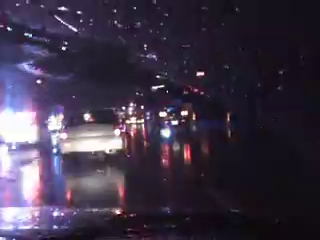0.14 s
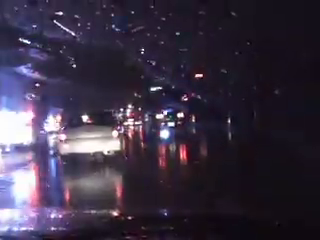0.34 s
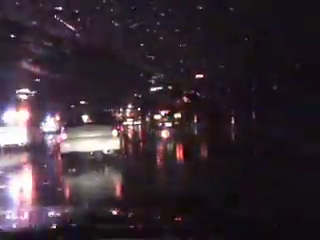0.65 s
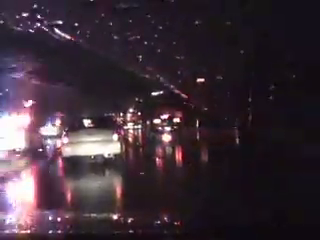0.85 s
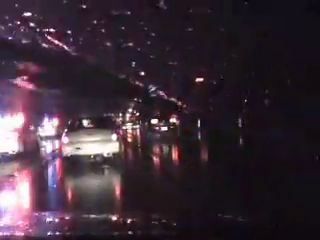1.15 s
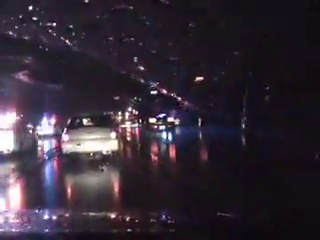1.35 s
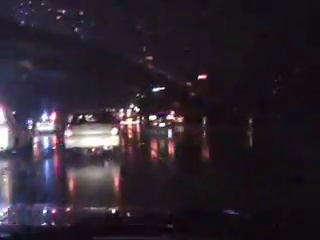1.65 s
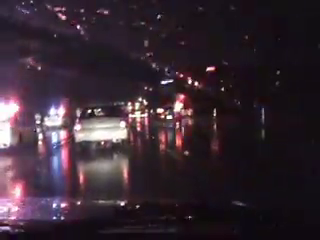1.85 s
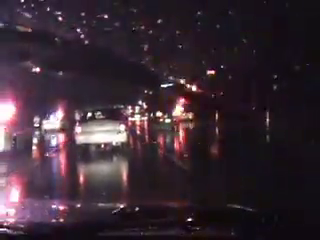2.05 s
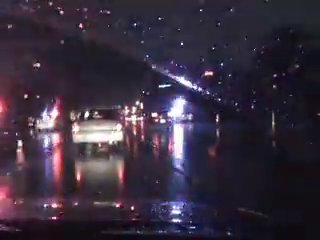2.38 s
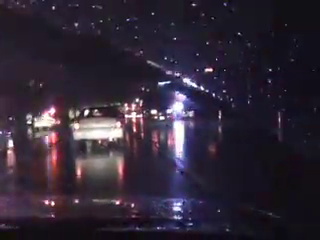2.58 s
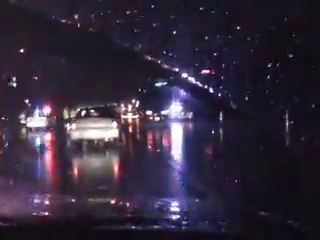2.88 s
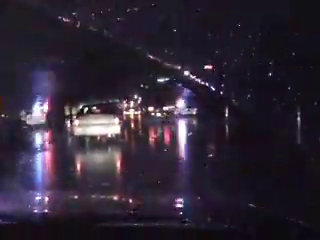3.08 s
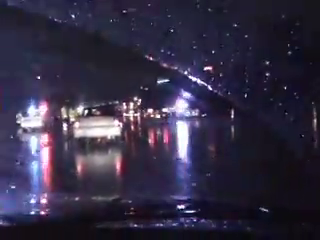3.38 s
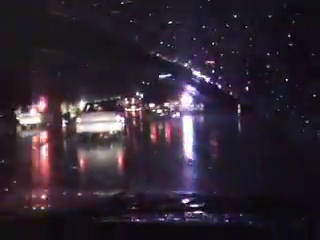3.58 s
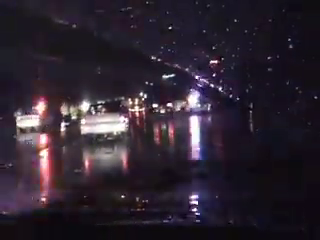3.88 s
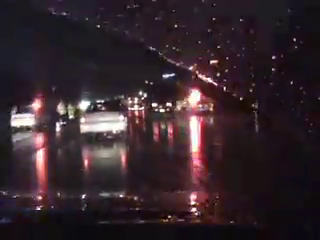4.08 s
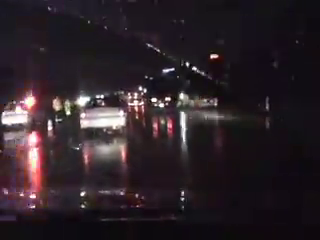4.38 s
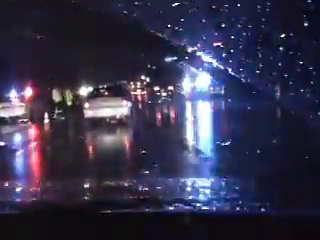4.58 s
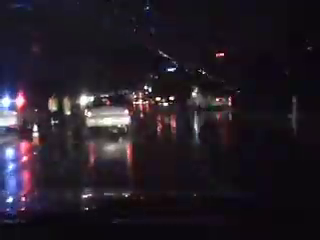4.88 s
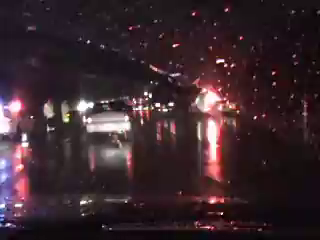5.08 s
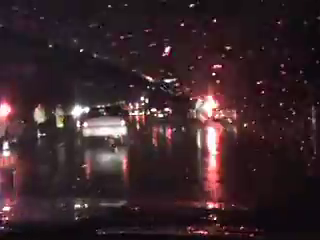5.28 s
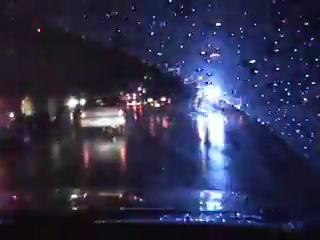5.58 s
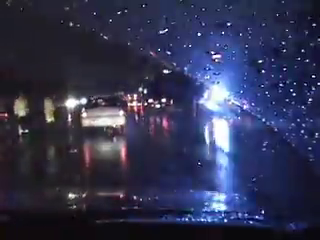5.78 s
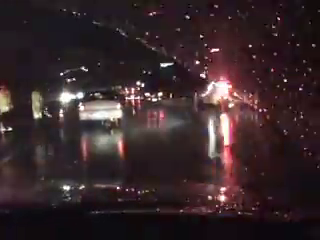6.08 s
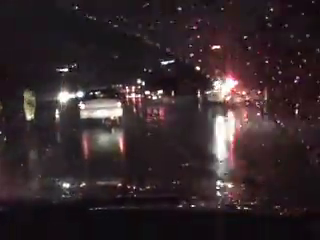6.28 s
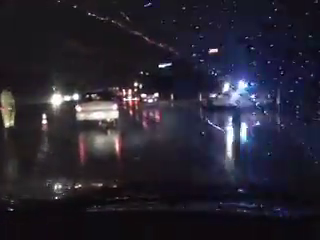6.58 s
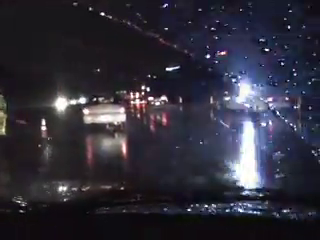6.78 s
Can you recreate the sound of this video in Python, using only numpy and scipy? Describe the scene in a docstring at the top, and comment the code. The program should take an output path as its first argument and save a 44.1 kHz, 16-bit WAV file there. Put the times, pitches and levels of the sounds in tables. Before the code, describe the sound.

Rain ticks and smacks on glass over soft tyre rumble, with juddering wiper thuds and paired rubbery flips, the drops growing denser near the end.

```python
"""Rain on a slowly rolling car, heard inside: noise-burst drops over a wash of fine spray, louder at the end.
Fat drops smack the windshield; a few heavy drops knock a panel with a hollow tock; dull pushes come from the
roof. Every 1.6 s the wipers make a judder and thud, then about 0.55 s later two rubbery flips. Filtered noise
makes the tyre and road rumble; two sines make a drivetrain hum; damped sines make bumps."""
import sys
import numpy as np
from scipy import signal
from scipy.fft import rfft, irfft, next_fast_len
from scipy.io import wavfile
from scipy.ndimage import map_coordinates

SR = 44100
rng = np.random.default_rng(int(sys.argv[2]) if len(sys.argv) > 2 else 0)


def waveform_to_disk(signal):
    """Save audio, clipped to [-1, 1], as 16-bit WAV at the path in sys.argv[1]."""
    frames = np.transpose(np.atleast_2d(signal))
    scaled = np.clip(frames, -1, 1) * 32767
    samples = np.round(scaled).astype(np.int16)
    wavfile.write(sys.argv[1], SR, samples)


N = 306230

# Steady rain: (time [s], level [dB])
RAIN_LEVEL = [(0, -39.5), (3.9, -39), (5.6, -37), (6.94, -32.5)]
# Flurries and lulls: (middle [s], length [s], change [dB])
RAIN_FLURRIES = [(0.552, 0.12, 1.5), (0.983, 0.11, 3.5), (1.2, 0.16, -2), (1.408, 0.13, 3),
                 (1.847, 0.12, 1.5), (2.954, 0.12, 1.5), (3.31, 0.87, 2), (3.763, 0.19, -2.5),
                 (4.217, 0.19, 3.5), (4.495, 0.24, 4), (4.748, 0.22, 1), (4.947, 0.12, -3.5),
                 (5.235, 0.37, 1), (5.55, 0.11, -3), (6.045, 0.081, 6.5), (6.22, 0.19, 2.5),
                 (6.61, 0.38, 1), (6.925, 0.074, 0.5)]
FLURRY_EDGE = 8.7  # exponent; higher is more abrupt
# Drop spectrum on glass: (frequency [Hz], relative level [dB])
PATTER_SPECTRUM = [(200, -19.5), (600, -11.5), (1200, -0.5), (1600, -2.5), (2100, -5), (2600, 2),
                   (3400, 1.5), (4200, -2.5), (5000, -6.5), (6500, -10.5), (7600, -12.5), (9500, -19),
                   (10500, -24), (11500, -55)]
# Fat windshield drops: (time [s], relative peak [dB], relative left minus right [dB], extra treble [dB])
BIG_DROPS = [(0.345, -26, 3, 7), (0.4626, -20, 2, -2), (0.8009, -18, 2, -4), (0.9851, -22, 2, -2),
             (1.0118, -18, 0, 1), (1.211, -19, 5, -1), (1.3627, -28, 8, -4), (1.378, -13, 4, 2),
             (1.4116, -17, 2, -7), (1.4827, -13, 9, 2), (2.6418, -18, 3, -11), (3.2042, -17.5, 9, 4),
             (3.3209, -15.5, 4, 3), (4.045, -23, 3, -2), (4.203, -22, 9, 8), (4.234, -19, 3, 9),
             (4.2608, -26, 2, 8), (4.282, -20, 2, 2), (4.3562, -16.5, 10, -12), (4.3877, -12.5, 8, 2),
             (4.4183, -26, 7, 1), (4.4503, -21, 5, 2), (4.496, -17, 8, 3), (4.5048, -22, 1, 9),
             (4.5117, -14, 12, 0), (4.5655, -24, 4, 3), (4.6523, -17.5, 9, 3), (4.709, -20, 4, -5),
             (4.7402, -9, 1, 3.5), (4.7546, -18.5, 8, 3), (4.825, -15, 3, 0), (4.879, -17, 7, 1),
             (5.052, -20, 7, 0), (5.1237, -17, 8, -2), (5.1632, -17, 6, -16), (5.1826, -20, 6, 8),
             (5.233, -15, 2, 4), (5.2503, -20.5, -2, 4), (5.3282, -17, 7, 3), (5.4285, -20, 2, -6),
             (5.4517, -23, 6, 0), (5.6389, -15.5, 5, -6), (5.6576, -19, 5, 2), (5.8056, -20, 7, 6),
             (5.9226, -17, 3, -3), (5.9529, -12.5, 10, -3), (5.9957, -13, 7, -4), (6.0195, -17, 5, 0),
             (6.028, -14, 2, 5), (6.0459, -14.5, 9, 0), (6.0637, -17, 8, 0), (6.0786, -21, 3, 3),
             (6.1674, -18, 7, 1), (6.1813, -12, 12, 5), (6.1897, -17, 4, 1), (6.2236, -24, -2, 11),
             (6.2802, -11, 8, 1), (6.2825, -19, 1, -10), (6.2873, -14.5, 4, -5), (6.3688, -15, -3, 0),
             (6.4165, -16.5, 2, 8), (6.4787, -17, 2, 9), (6.5386, -27, 3, 3), (6.5522, -17, -1, 5),
             (6.6052, -16, 7, -1), (6.6194, -20, 4, 3), (6.6331, -11, 5, 1), (6.694, -22, 5, -5),
             (6.713, -12.5, 4, 6), (6.7495, -13.5, 5, -5), (6.7768, -19, 7, 3), (6.887, -17, 8, 7),
             (6.903, -21, 6, -3), (6.9127, -14, 5, -3), (6.92, -20, 5, -6)]
# Heavy drops knocking the bonnet or roof panel: (time [s], level [dB], pitch [Hz])
PANEL_KNOCKS = [(1.3783, -22, 1250), (1.3948, -12, 1220), (4.7411, -10, 1150), (6.368, -17, 1200)]

# Wiper turns at the foot of the glass: (time [s], rub [dB], thud [dB], shudder [dB])
WIPER_TURNS = [(0.103, -17.5, -16, -24), (1.711, -18, -11.5, -32), (3.317, -18, -7.5, -27),
               (4.927, -20, -10, -27.5), (6.533, -17, -20, -26)]
# Arm shudder spectrum: (frequency [Hz], relative level [dB])
SHUDDER_SPECTRUM = [(60, -27), (130, -1), (300, -1.5), (600, -2.5), (850, -17), (2000, -47), (5000, -100)]
# Blade flips at the far end: (time [s], level [dB], starting pitch [Hz], hold before release [s])
BLADE_FLIPS = [(0.654, -16, 537, 0.015), (0.699, -19.5, 518, .023), (2.265, -17.5, 542, 0.015),
               (2.306, -18.5, 520, .023), (3.873, -16, 520, 0.013), (3.918, -15, 521, .017),
               (5.478, -17.5, 538, 0.012), (5.523, -14.5, 513, .015)]
# Rubber on wet glass: (frequency [Hz], relative level [dB])
SCUFF_SPECTRUM = [(150, -30), (350, 3.5), (600, 1.5), (800, -8), (1300, -12), (2500, -45), (5000, -100)]
LIP_ROUGHNESS = 0.38  # uneven grip, 0-1
LIP_EASE_DB_PER_S, LIP_RISE_S = 105, 0.0009

# Drivetrain pulls up, shifts, pulls again: (time [s], hum pitch [Hz])
HUM_PITCH = [(0, 110), (1.1, 119.6), (2.0, 163.5), (2.8, 194.5), (3.2, 202.9), (3.65, 211.9), (4.15, 173.3),
             (4.8, 183), (5.5, 180.8), (6.0, 191.7), (6.94, 205.6)]
# Cabin resonances met by the hum: (frequency [Hz], relative level [dB])
CABIN_BOOM = [(110, -37), (143, -33.5), (166, -35.5), (182, -36), (193, -28.5), (208, -36), (240, -67),
              (325, -40), (355, -35), (385, -46.5), (411, -36), (425, -46)]
# Road bumps: (time [s], level [dB], pitch [Hz])
ROAD_BUMPS = [(0.191, -17, 117), (0.344, -16, 91), (1.193, -11.5, 151), (1.244, -11, 118),
              (2.508, -10.5, 99), (4.412, -14, 158), (4.755, -10.5, 68.5), (5.885, -13, 107)]

# Road rumble spectrum: (frequency [Hz], relative level [dB])
RUMBLE_SPECTRUM = [(12, -29), (25, -9), (33, -13), (42, -3.5), (52, -5), (64, 2.5), (76, 0.5), (90, -2),
                   (115, -2), (150, -4), (190, -13), (260, -14), (340, -38), (570, -120)]
CRUISE_HZ, RUMBLE_AT_CRUISE_DB, RUMBLE_DB_PER_DOUBLING = 187, -23, 5
# Cabin drone spectrum: (frequency [Hz], relative level [dB])
DRONE_SPECTRUM = [(120, -7.5), (200, -4.5), (270, -2), (350, 0), (450, -2), (600, -8), (740, -8),
                  (830, -14), (1050, -10.5), (1400, -16), (2200, -19), (5000, -55.5)]
# Drone swell as the car gathers way: (time [s], level [dB])
DRONE_SWELL = [(0, -28), (1.8, -28), (3.6, -26), (4.7, -26.5), (5.9, -25.5), (6.94, -24.5)]
# Tyre-driven resonances: (centre [Hz], half-width at half amplitude [Hz], level [dB])
TYRE_RESONANCES = [(123.6, 5.4, -32.5), (413.3, 10.5, -41), (513, 28, -43.5), (740, 30, -43),
                   (916, 18.6, -40), (969, 33, -39)]

# Stereo likeness of the noise: (frequency [Hz], left-right correlation [-1 to 1])
STEREO_LIKENESS = [(30, .85), (60, .9), (150, .945), (490, .89), (1380, .79), (3900, .58), (11200, .73)]
# Stereo lean of the whole cabin: (frequency [Hz], left minus right [dB])
STEREO_LEAN = [(30, -3), (60, -1), (110, 0.5), (190, 1.7), (340, 1), (610, 2.5), (1090, 4), (1960, 3.5),
               (3500, 3.5), (6250, 2), (11200, 0.5)]
TOP_HZ = 11600


def amp(db):
    """Decibels to gain."""
    return 10 ** (np.asarray(db) / 20)


def unit(x):
    """Scale to rms 1."""
    return x / np.sqrt(np.mean(x ** 2) + 1e-20)


def along(points, hz):
    """Interpolate (frequency [Hz], value) points on a log axis."""
    f, v = np.transpose(points)
    return np.interp(np.log(hz + 1), np.log(f + 1), v)


def curves(rows):
    """One value per sample for each column after the time."""
    s, *cols = np.transpose(rows)
    return [np.interp(np.arange(N) / SR, s, c) for c in cols]


def wobble(knots_per_s):
    """Smooth random curve through normally distributed knots."""
    knots = rng.standard_normal(int(N * knots_per_s / SR) + 4)
    return map_coordinates(knots, [np.arange(N) * knots_per_s / SR])


def filtered(x, response):
    """Multiply the spectrum of x by a function of frequency."""
    m = next_fast_len(N + SR // 2)
    return irfft(rfft(x, m) * response(np.fft.rfftfreq(m, 1 / SR)), m)[..., :N]


def causal(points, size=2048):
    """Sharp-fronted (minimum-phase) impulse response with a given spectrum."""
    cepstrum = irfft(np.log(amp(along(points, np.fft.rfftfreq(size, 1 / SR)))))
    cepstrum[1:size // 2] *= 2
    cepstrum[size // 2 + 1:] = 0
    return irfft(np.exp(rfft(cepstrum)))


def rush(gain):
    """Stereo noise of rms 1 with a given spectrum and the tabled left-right correlation."""
    def mid_side_gain(hz):
        # cos(2 * angle) is the correlation
        angle = np.arccos(np.clip(along(STEREO_LIKENESS, hz), -1, 1)) / 2
        return gain(hz) * np.array([np.cos(angle), np.sin(angle)])

    mid, side = filtered(rng.standard_normal((2, N)), mid_side_gain)
    return unit(np.array([mid + side, mid - side]))


def burst(points, t):
    """Short noise of rms 1 with a given spectrum."""
    spectrum = rfft(rng.standard_normal(len(t))) * amp(along(points, np.fft.rfftfreq(len(t), 1 / SR)))
    return unit(irfft(spectrum, len(t)))


def sine(hz, t):
    """Steady tone at zero phase when t is 0."""
    return np.sin(2 * np.pi * hz * t)


def swell(t, peak_s):
    """Soft rise to 1 at peak_s, then an exponential fall."""
    return t / peak_s * np.exp(1 - t / peak_s)


def add(track, s, sound):
    """Mix a sound into a track at time s."""
    part = track[..., max(round(s * SR), 0):][..., :sound.shape[-1]]
    part += sound[..., :part.shape[-1]]


def rain(drops_per_s=340, size_db=2.0, coarsening_per_db=0.04, patter_db=0, wash_db=-4.0,
         wash_follow=0.43, colour_db=8, usual_treble_db=-4.5, spots=60):
    """Drops land at random on dull to bright spots, sizes more uneven in heavier rain, over fine spray."""
    level_db = shower()
    surge_db = level_db - level_db.mean()
    patter = np.zeros((2, N))
    for brightness in np.linspace(-1, 1, spots):
        glass = pane(usual_treble_db + colour_db * brightness)
        sound = splat(glass, snap=13, tick_t60_s=0.03, ring=0.9, ring_t60_s=0.004)
        lands = np.flatnonzero(rng.random(N) < drops_per_s / spots / SR)
        heft = np.minimum(rng.exponential(size=N)[lands], 2.8) - 1
        sizes = amp(size_db * heft * np.exp(coarsening_per_db * surge_db[lands]))
        for sample, size in zip(lands, sizes):
            add(patter, sample / SR, size * sound)
    spray_db = level_db.mean() + wash_follow * surge_db + wash_db
    spray = amp(spray_db) * rush(lambda hz: amp(along(PATTER_SPECTRUM, hz)))
    return amp(level_db + patter_db) * unit(patter) + spray


def shower():
    """Rain level in dB: the steady fall plus rounded flurries and lulls."""
    t = np.arange(N) / SR
    level_db = curves(RAIN_LEVEL)[0]
    for middle_s, length_s, change_db in RAIN_FLURRIES:
        level_db = level_db + change_db * np.exp(-np.abs(2 * (t - middle_s) / length_s) ** FLURRY_EDGE)
    return level_db


def splat(glass, snap, tick_t60_s, ring, ring_t60_s, ring_hz=2400, scatter=0.38,
          cabin_db=-15, cabin_t60_s=0.06, spread_db=11.5):
    """One drop at rms 1: snap, noisy splash, brief ring and cabin reflections, coloured by the glass."""
    t = np.arange(SR // 20) / SR
    pitch, place = rng.standard_normal(2)
    tick = rng.standard_normal(len(t)) * amp(-60 * t / tick_t60_s) + snap * (t == 0)
    tone = ring * sine(ring_hz * np.exp(scatter * pitch), t) * amp(-60 * t / ring_t60_s)
    cabin = rng.standard_normal((2, len(t))) * amp(cabin_db - 60 * t / cabin_t60_s)
    pan = amp(spread_db * place * np.array([[.5], [-.5]]))
    return unit(signal.fftconvolve((tick + tone + cabin) * pan, glass[None], axes=1))


def pane(treble_db, treble_hz=4800):
    """Impulse response of the glass, brighter or duller with the spot hit."""
    return causal([(hz, db + treble_db / (1 + (treble_hz / hz) ** 4)) for hz, db in PATTER_SPECTRUM])


def big_drops(drop_db=-0.16, snap=11, tick_t60_s=0.03, ring_hz=3100, echo_s=0.0021, echo_db=-9):
    """Fat drops smack the glass, each with its own brightness, a short ring and a dashboard echo."""
    out = np.zeros((2, N))
    usual_pan_db = np.mean([pan_db for s, db, pan_db, treble_db in BIG_DROPS])
    for s, db, pan_db, treble_db in BIG_DROPS:
        smack = splat(pane(treble_db), snap=snap, tick_t60_s=tick_t60_s, ring_hz=ring_hz, ring=1.2,
                      ring_t60_s=0.003, scatter=0.15, cabin_db=-16, spread_db=0)
        smack = smack / np.abs(smack.mean(0)).max()
        smack = amp(db + drop_db + (pan_db - usual_pan_db) * np.array([[.5], [-.5]])) * smack
        add(out, s, smack)
        add(out, s + echo_s, amp(echo_db) * smack)
    return out


def panel_knocks(t60_s=0.0088, rise_s=0.0002):
    """Heavy drops knock the bonnet or roof panel: a short, hollow tock from a decaying sine."""
    out, t = np.zeros(N), np.arange(SR // 30) / SR
    for s, db, hz in PANEL_KNOCKS:
        add(out, s, amp(db - 60 * t / t60_s) * (1 - np.exp(-t / rise_s)) * sine(hz, t))
    return out


def roof(drops_per_s=11, thud_db=-18, size_db=0.0, thud_s=0.0022):
    """Heavy drops dent the padded roof: single dull pushes of random width with no ring."""
    out, t = np.zeros(N), np.arange(-SR // 50, SR // 50) / SR
    lands = np.flatnonzero(rng.random(N) < drops_per_s / SR)
    for sample, (size, width) in zip(lands, rng.standard_normal((N, 2))[lands]):
        u = t / (thud_s * np.exp(0.32 * width))
        push = (u ** 2 - 1) * np.exp(-u ** 2 / 2)
        add(out, sample / SR, amp(thud_db + size_db * min(size, 1.5)) * push)
    return out


def wiper_turns(rub_s=0.0423, slip_hz=420, slowing_per_s=13, jitter=0.18, scrape_hz=570, scrape=0.44,
                thud_after_s=0.028, thud_hz=130, thud_rise_s=0.0063, knock_after_s=0.04, knock_hz=290,
                knock_db=-4, knock_rise_s=0.00065, shudder_rise_s=0.018):
    """Blades judder ever slower to a stop; arms reverse with a thud, linkage slack knocks, arms shudder."""
    out, t = np.zeros(N), np.arange(SR // 6) / SR
    for s, rub_db, thud_db, shudder_db in WIPER_TURNS:
        stick, grip = wobble(250.2)[:2 * len(t)].reshape(2, -1)
        judder_hz = slip_hz * np.exp(-slowing_per_s * t + jitter * stick)
        judder = np.sin(2 * np.pi * np.cumsum(judder_hz) / SR)
        lip = scrape * grip * sine(scrape_hz, t)
        pressure = np.sqrt(np.abs(np.sin(np.pi * np.minimum(t / rub_s, 1))))
        thud = amp(thud_db) * swell(t, thud_rise_s) * sine(thud_hz, t)
        shudder = amp(shudder_db) * swell(t, shudder_rise_s) * burst(SHUDDER_SPECTRUM, t)
        knock = amp(thud_db + knock_db) * swell(t, knock_rise_s) * sine(knock_hz, t)
        add(out, s, amp(rub_db) * pressure * (judder + lip))
        add(out, s + thud_after_s, thud + shudder)
        add(out, s + knock_after_s, knock)
    return out


def blade_flips(release_s=0.0036, sag_per_s=2, tap_hz=1050, tap_db=-3, tap_t60_s=0.02, scuff_db=-11,
                scuff_rise_s=0.013, arm_after_s=0.00944, arm_hz=190, arm_db=-1, arm_rise_s=0.00083):
    """Each rubber lip taps over, chatters with sagging pitch and scuffs; the arm knocks behind it."""
    out, t = np.zeros(N), np.arange(SR // 8) / SR
    for s, db, hz, hold_s in BLADE_FLIPS:
        grip, slip = LIP_ROUGHNESS * wobble(202.0)[:2 * len(t)].reshape(2, -1)
        phase = 2 * np.pi * np.cumsum(hz * np.exp(-sag_per_s * t)) / SR + slip
        held = (1 - np.exp(-t / LIP_RISE_S)) * np.exp(-np.maximum(t - hold_s, 0) / release_s)
        chatter = (1 + grip / 2) * held * amp(-LIP_EASE_DB_PER_S * t) * np.sin(phase)
        tap = amp(tap_db - 60 * t / tap_t60_s) * sine(tap_hz, t)
        scuff = amp(scuff_db) * swell(t, scuff_rise_s) * burst(SCUFF_SPECTRUM, t)
        add(out, s, amp(db) * (chatter + tap + scuff))
        add(out, s + arm_after_s, amp(db + arm_db) * swell(t, arm_rise_s) * sine(arm_hz, t))
    return out


def drivetrain(hum_db=2.0, waver_db=1.5):
    """A hum and its octave follow shaft speed and swell as they cross cabin resonances."""
    hz, = curves(HUM_PITCH)
    phase = 2 * np.pi * np.cumsum(hz) / SR
    hum = sum(amp(along(CABIN_BOOM, k * hz)) * np.sin(k * phase) for k in (1, 2))
    return amp(hum_db + waver_db * wobble(12)) * hum


def bumps(rise_s=0.0046):
    """Each bump makes the cabin boom briefly: a soft-edged, quickly fading sine."""
    out, t = np.zeros(N), np.arange(SR // 5) / SR
    for s, db, hz in ROAD_BUMPS:
        add(out, s, amp(db) * swell(t, rise_s) * sine(hz, t))
    return out


def road(tyre_db=0, waver_db=1.1):
    """Road roughness shakes the body, harder with speed; the tread hums in narrow resonances."""
    doublings = np.log2(curves(HUM_PITCH)[0] / CRUISE_HZ)
    rumble_db = RUMBLE_AT_CRUISE_DB + RUMBLE_DB_PER_DOUBLING * doublings
    rumble = amp(rumble_db) * rush(lambda hz: amp(along(RUMBLE_SPECTRUM, hz)))
    drone_db = curves(DRONE_SWELL)[0] + waver_db * wobble(14)
    drone = amp(drone_db) * rush(lambda hz: amp(along(DRONE_SPECTRUM, hz)))
    tread = np.zeros((2, N))
    for centre_hz, width_hz, db in TYRE_RESONANCES:
        tread += amp(db) * rush(lambda hz: 1 / (1 + ((hz - centre_hz) / width_hz) ** 2))
    return rumble + drone + amp(tyre_db) * tread


def scene():
    """Sum all sources, then lean the mix left or right by frequency, mostly left above the bass."""
    water = rain() + big_drops() + panel_knocks() + roof()
    wipers = wiper_turns() + blade_flips()
    car = drivetrain() + bumps() + road()
    lean = lambda hz: amp(along(STEREO_LEAN, hz) * np.array([[.5], [-.5]]))
    return filtered(water + wipers + car, lean)


def record(dry):
    """Cut everything from TOP_HZ up."""
    return filtered(dry, lambda hz: hz < TOP_HZ)


dry = scene()
out = record(dry)
waveform_to_disk(out)
```